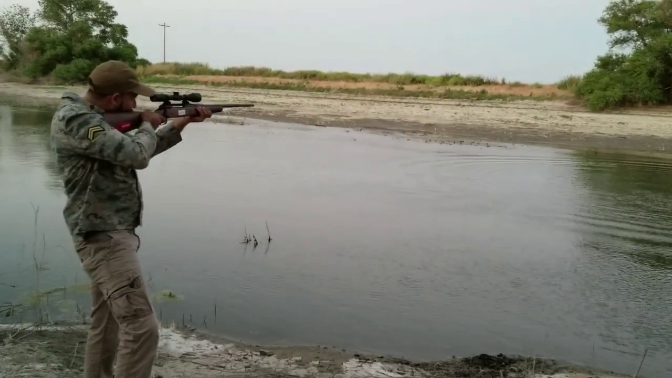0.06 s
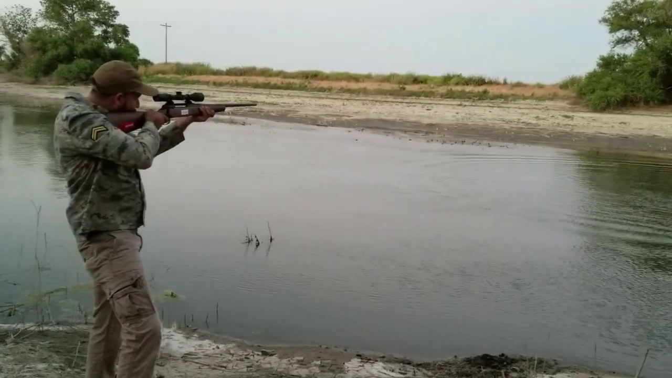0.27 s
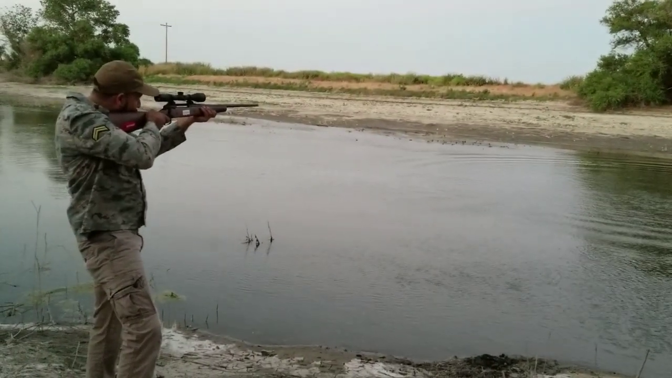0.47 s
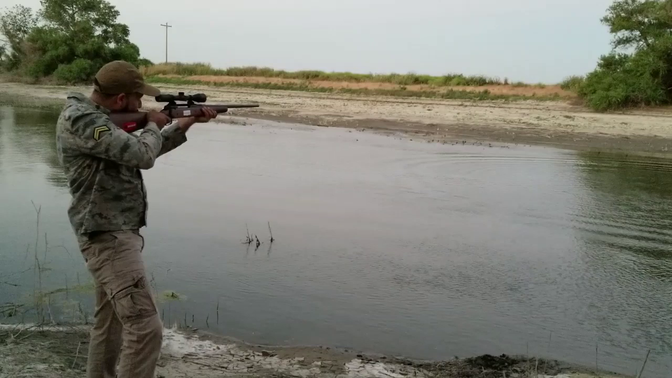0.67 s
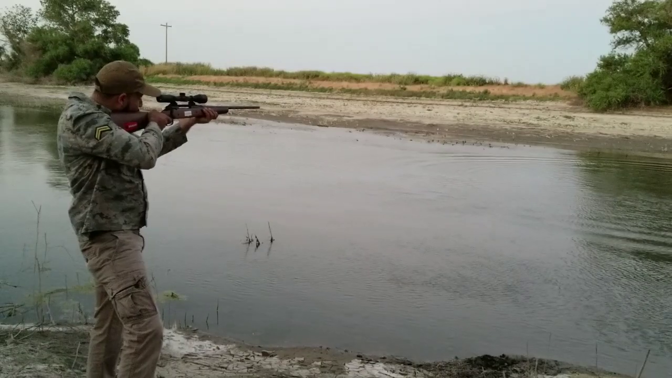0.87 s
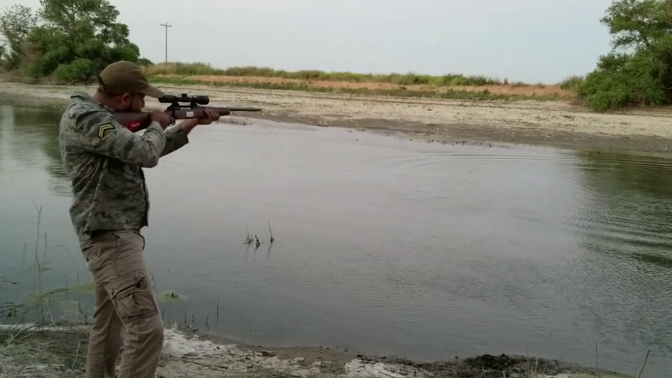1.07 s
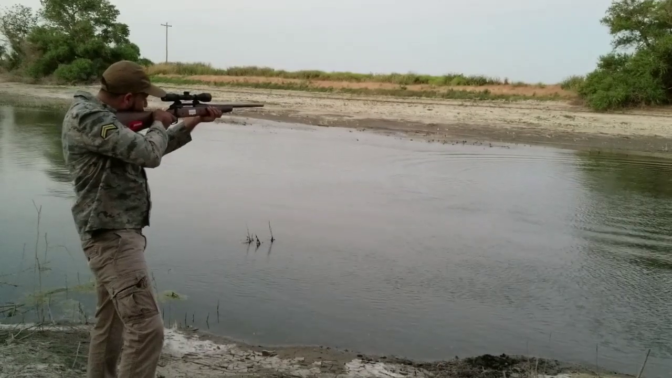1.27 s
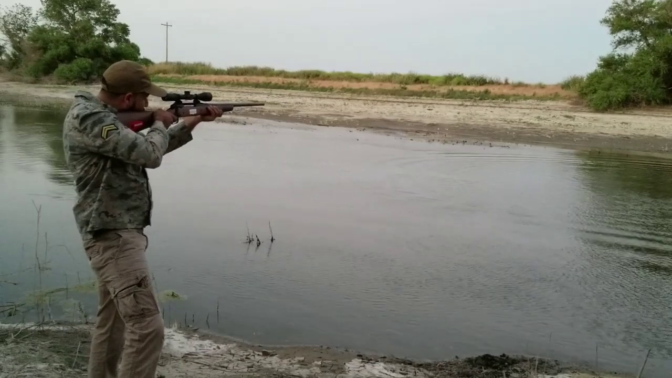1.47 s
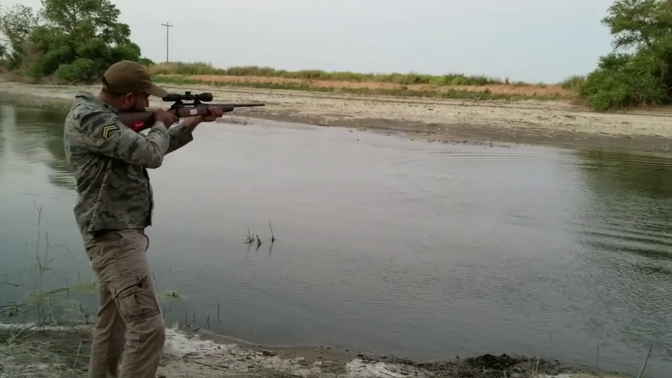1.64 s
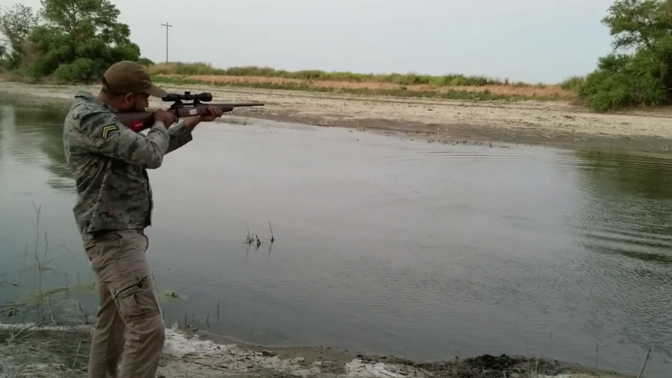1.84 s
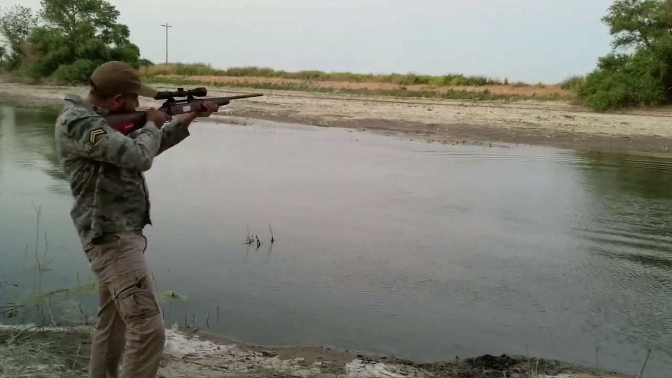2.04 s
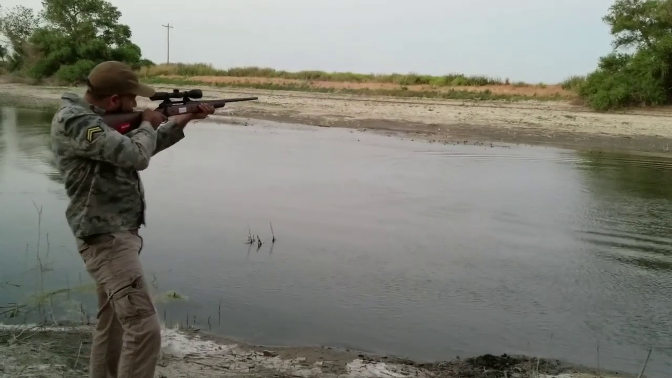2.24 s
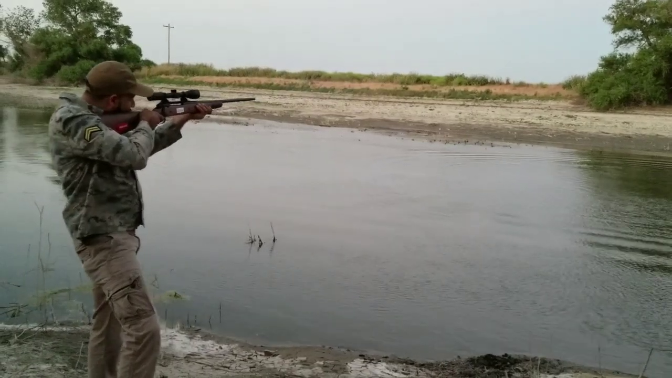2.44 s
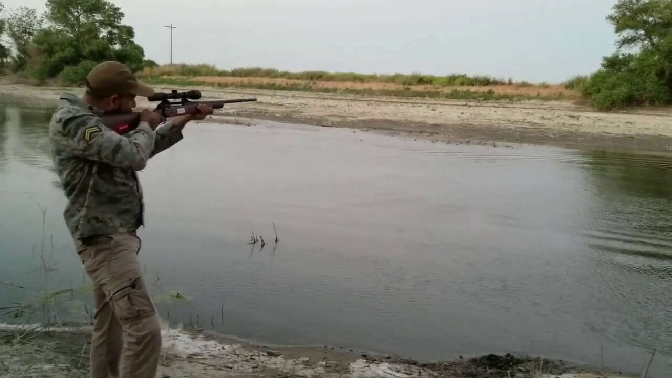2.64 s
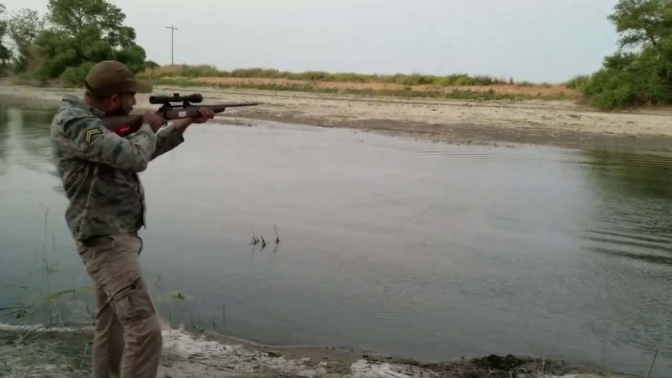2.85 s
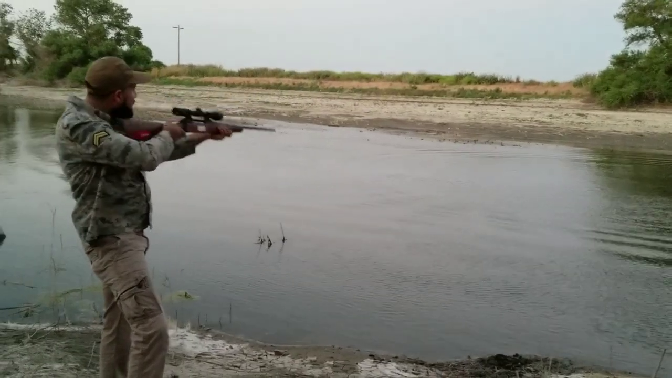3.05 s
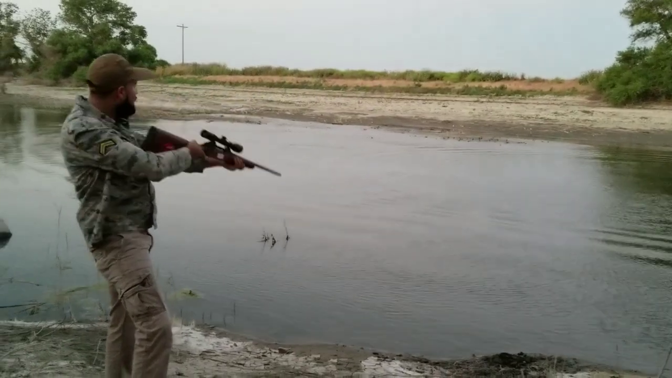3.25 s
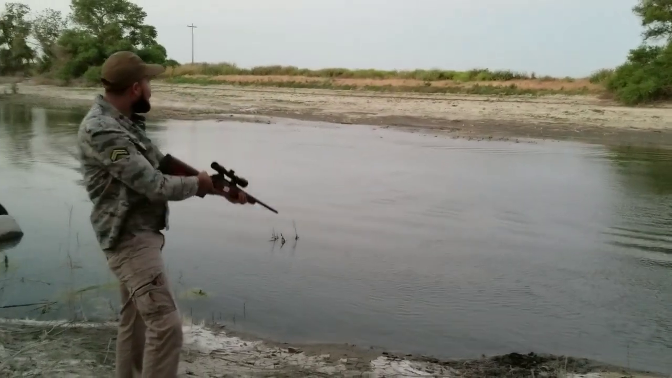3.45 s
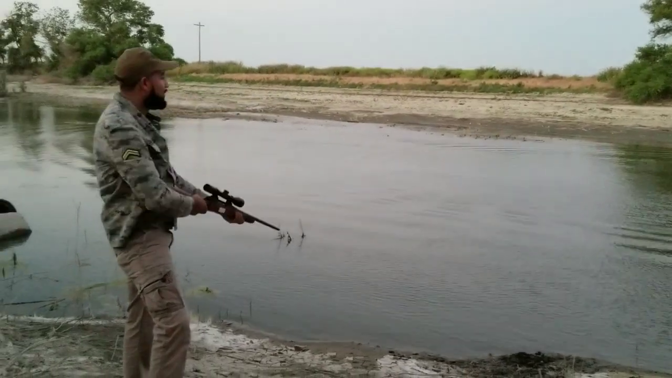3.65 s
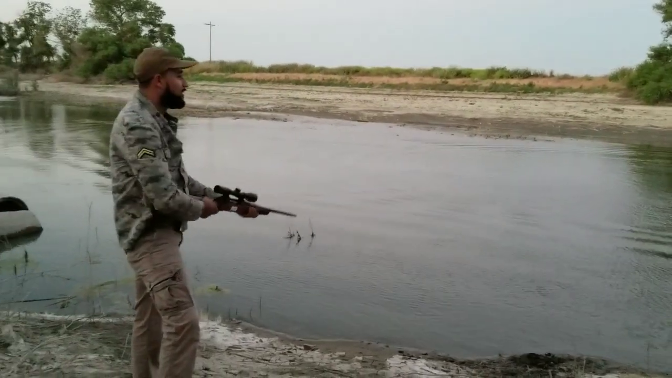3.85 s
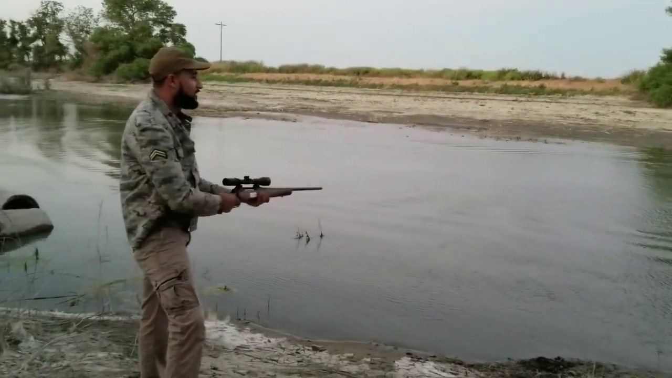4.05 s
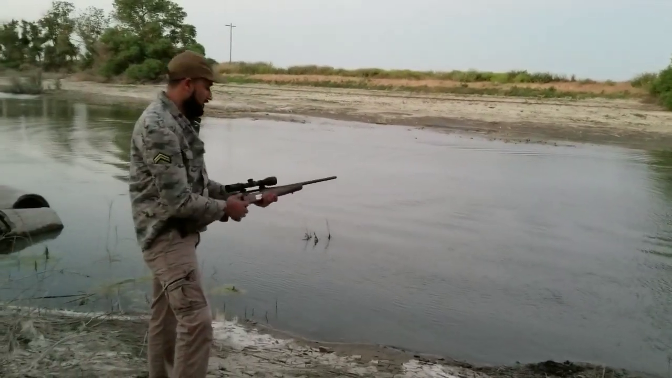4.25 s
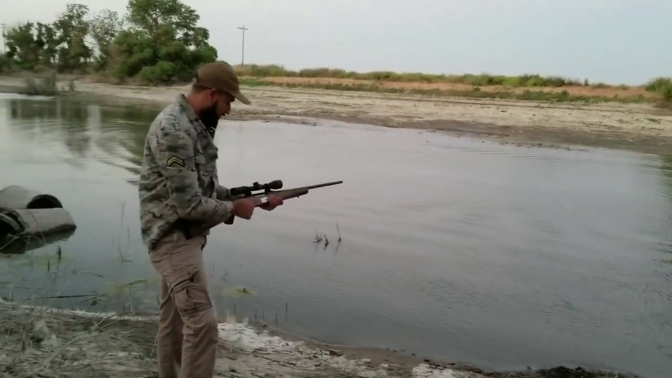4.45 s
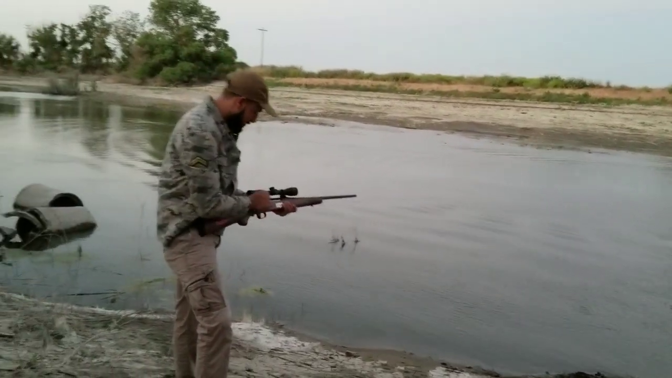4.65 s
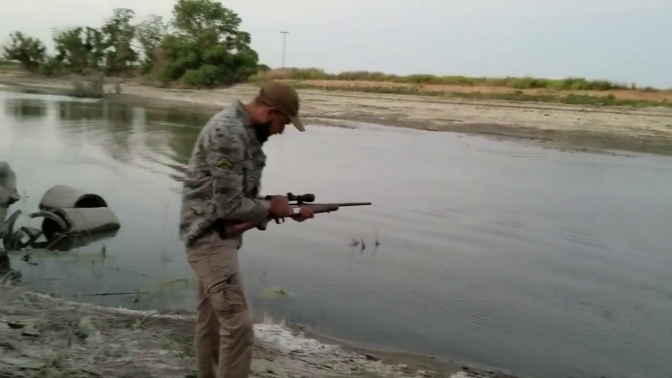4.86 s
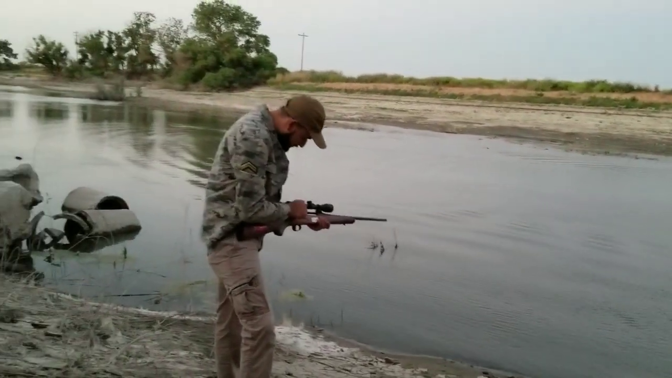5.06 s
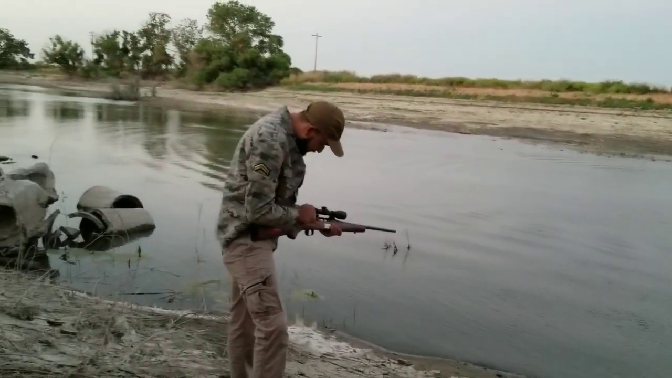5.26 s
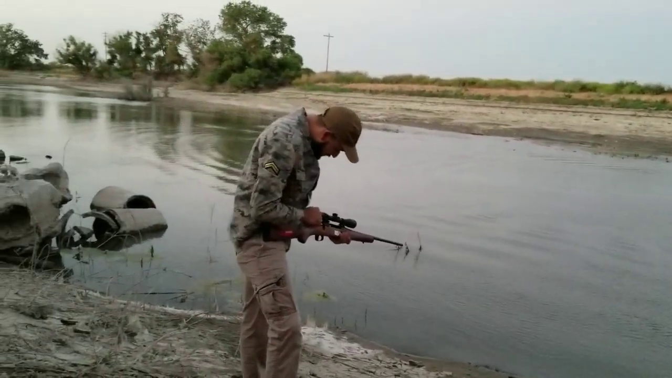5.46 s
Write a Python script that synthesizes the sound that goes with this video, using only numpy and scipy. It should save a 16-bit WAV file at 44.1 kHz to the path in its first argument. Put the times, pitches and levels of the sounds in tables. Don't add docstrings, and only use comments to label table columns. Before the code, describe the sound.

Open waterside, stereo microphones near a rifle shooter. Faint far traffic hum, mostly left, with an engine note swelling and fading, soft hiss and tiny distant bird chips. Then one rifle shot overloads the microphones; echoes return from banks, trees and hills, increasingly dull. The background dips and recovers, and finally the bolt is worked close by in short wood and metal clacks.

```python
import sys
import numpy as np
from scipy import signal
from scipy.fft import rfft, irfft, next_fast_len
from scipy.io import wavfile
from scipy.ndimage import uniform_filter1d, map_coordinates

SR = 44100
rng = np.random.default_rng(int(sys.argv[2]) if len(sys.argv) > 2 else 0)


def gain_from_db(level_db):
    decades = np.asarray(level_db, float) / 20
    return 10 ** decades


def master_out(mix):
    frames = np.transpose(np.atleast_2d(mix))
    ceiling = np.clip(frames, -1, 1)
    pcm = np.round(ceiling * 32767).astype(np.int16)
    wavfile.write(sys.argv[1], SR, pcm)


N = 243323
SPACING = 17.5
SHOT = 2.3012


def unit(x):
    return x / np.sqrt(np.mean(x ** 2) + 1e-20)


def along(points, hz):
    f, v = np.transpose(points)
    return np.interp(np.log(hz + 1), np.log(f + 1), v)


def curves(rows):
    s, *cols = np.transpose(rows)
    return np.array([np.interp(np.arange(N) / SR, s, c) for c in cols])


def wobble(rate):
    knots = rng.standard_normal(int(N * rate / SR) + 4)
    return map_coordinates(knots, [np.arange(N) * rate / SR])


def causal(points, size=4096):
    level_db = np.maximum(along(points, np.fft.rfftfreq(size, 1 / SR)), -70)
    cepstrum = irfft(np.log(gain_from_db(level_db)))
    fold = np.r_[1, np.full(size // 2 - 1, 2), 1, np.zeros(size // 2 - 1)]
    h = irfft(np.exp(rfft(cepstrum * fold)))
    return h / np.linalg.norm(h)


def delayed(x, lag):
    m = next_fast_len(len(x), True)
    ramp = np.exp(-1j * np.pi * np.fft.rfftfreq(m) * lag * np.array([[1], [-1]]))
    return irfft(rfft(x, m) * ramp, m)[:, :len(x)]


def scatter(n, directions, spiky_db):
    size = gain_from_db(spiky_db * rng.exponential(1, (len(directions), n)))
    returns = size * rng.standard_normal(size.shape)
    return unit(sum(delayed(r, SPACING * d) for r, d in zip(returns, directions)))


def patchy(x, depth_db):
    z = signal.stft(x, nperseg=256)[2]
    field = uniform_filter1d(rng.standard_normal(z.shape[1:]), size=4, axis=0)
    field = uniform_filter1d(field, size=9, axis=1)
    return unit(signal.istft(z * gain_from_db(depth_db * unit(field)), nperseg=256)[1][:, :N])


# [t/s, level/dB]
AIR = [
    (0.0, -3),
    (0.1, 0),
    (1.3, 1.5),
    (2.9, -1),
    (3.3, -11),
    (3.5, -5),
    (4.0, -1),
    (4.7, 0),
    (5.5, 1),
]
# [t/s, level/dB, half length/s]
DRONE = [
    (.42, -68.5, .4),
    (1.25, -72, .45),
    (2.15, -79, .3),
    (3.82, -73, .25),
    (4.39, -77, .12),
    (5.03, -69, .4),
]
# [f/Hz, level/dB per Hz]
RUMBLE = [(15, -19.5), (30, -11), (81, 2), (108, -1.5), (166, -6), (200, -20), (311, -11), (430, -15.5),
          (771, -10.5), (1110, -18), (1950, -21), (3500, -48), (5000, -45), (8000, -78)]
HISS = [(400, -20), (1500, 2), (4850, -9.5), (8600, -9), (10000, -12), (12500, -8), (13900, -8),
        (14500, -10), (14800, -59.5)]


def countryside():
    air_db, t = curves(AIR)[0], np.arange(N) / SR
    rumble_db = -68.5 + air_db
    rustle_db = 2 * np.exp(-((t - 4.75) / .55) ** 2)
    hiss_db = -83 + .45 * air_db + rustle_db

    def coloured(x, points):
        return unit(signal.oaconvolve(x, causal(points)[None], axes=1)[:, :N])

    def white():
        return rng.standard_normal((2, N))

    traffic = patchy(scatter(N, [-.85, -.7], spiky_db=0.5), depth_db=1.5)
    traffic = coloured(traffic, RUMBLE) * gain_from_db(0.48 * wobble(2.7))
    buffet = coloured(white(), [(15, -9), (40, -1), (90, -6), (200, -39)])
    buffet *= gain_from_db(rumble_db - 8.5 + 3.2 * wobble(5))
    swell = sum(gain_from_db(db - 24 * ((t - s) / half) ** 4) for s, db, half in DRONE)
    engine_hz = 158.5 + .6 * wobble(4)
    engine = swell * gain_from_db(1.5 * wobble(8.6)) * np.sin(2 * np.pi * np.cumsum(engine_hz) / SR)
    hiss = gain_from_db(hiss_db + 8.5) * coloured(white(), HISS)
    return gain_from_db(rumble_db + 2.5) * traffic + buffet + engine + hiss


# [t/s, level/dB, from f/Hz, to f/Hz, length/s]
CHIRPS = [
    (1.107, -78, 5900, 5250, 0.034),
    (1.42, -81, 4900, 4500, .03),
    (2.267, -73, 6700, 5150, 0.051),
    (4.283, -76, 5700, 5270, .03),
    (5.183, -80, 6600, 5576, 0.04),
]


def bird():
    out = np.zeros(N)
    for s, db, from_hz, to_hz, length in CHIRPS:
        u = np.arange(round(length * SR)) / (length * SR)
        blur = 300 * rng.standard_normal(len(u) // 40 + 1).repeat(40)[:len(u)]
        pitch = to_hz + (from_hz - to_hz) * (1 - u) ** 2 + blur
        swell = gain_from_db(db + 1.5) * np.sin(np.pi * u ** 1.95)
        out[round(s * SR):][:len(u)] += swell * np.sin(2 * np.pi * np.cumsum(pitch) / SR)
    return delayed(out, 8)


# [t/s, level/dB, hold/s, boom re level/dB, fizz re level/dB]
BELTS = [(2.3015, -18.5, .007, -5, -6), (2.312, -24, .01, -1, -1), (2.321, -18, .028, 3, -7.5),
         (2.385, -32, .02, -7, -10), (2.44, -38.5, .16, -7, -6.5), (2.542, -40, .02, -2, 8),
         (2.65, -44.5, .075, -6, -8), (2.8, -57, .035, -2, -11), (2.92, -55.5, .15, -3, -7),
         (3.12, -57.5, .1, -8, -10), (3.27, -61, .045, -8, -10), (3.39, -66, .05, 4, -16),
         (3.48, -66, .3, 0, -19), (3.88, -75, 1.1, 8, -18)]


def belts():
    t, power = np.arange(0, N, 8) / SR, 0
    fizz_faster = np.array([[1], [1], [1.3]])
    for s, db, hold, boom_db, fizz_db in BELTS:
        rise_s = .0009 + .03 * max(s - SHOT, 0)
        rise = 1 - np.exp(-np.clip(t - s + .004, 0, None) / rise_s)
        fall_rate = 12 / (hold + .012)
        fall_db = fall_rate * np.clip(t - s - hold, 0, None) * fizz_faster
        balance_db = np.array([[boom_db], [1.5], [fizz_db + 3]])
        power = power + (rise ** 3 * gain_from_db(db - fall_db + balance_db)) ** 2
    return np.sqrt(power).repeat(8, axis=1)[:, :N]


# [t/s, peak level/dB, tilt/dB: hard and small bright, broad and soft dark]
BLOWS = [(2.3025, -4, 2), (2.3055, -4, -2), (2.316, -3, -8), (2.323, -11, 4), (2.331, -7, 0),
         (2.339, -8, -8), (2.343, -6, -9), (2.348, -7, -4), (2.354, -9, -4), (2.36, -12, -1),
         (2.372, -27, -9), (2.38, -26, -6)]
BANKS = [(2.462, -30, 13), (2.482, -27, 4), (2.511, -26, -3), (2.538, -17, 6), (2.552, -17, 13),
         (2.574, -28, 4), (2.645, -24, -3), (2.662, -23, -4), (2.684, -27, -6), (2.762, -38, -2),
         (2.805, -45, 0), (2.819, -44, -6), (2.99, -39, -4), (3.05, -40, -7), (3.067, -41, -9),
         (3.146, -46, -4), (3.311, -43, -2), (3.327, -55, -2), (3.342, -53, -2)]
HILLS = [(3.405, -48, -11), (3.447, -54, -3), (3.474, -42, 9), (3.489, -41, 9), (3.511, -45, 12),
         (3.554, -46, -4), (3.572, -41, -11), (3.599, -50, -6), (3.694, -49, -13), (3.74, -49, 0),
         (3.768, -50, 2), (3.786, -48, -13), (4.015, -50, -4)]
SWELLS = [
    (2.52, -27, -12),
    (2.635, -31, -6),
    (2.712, -35, 5),
    (2.95, -41, 7),
    (3.03, -42, 8),
    (3.21, -48, 9),
]
WOODS = [
    (3.385, -55, -7),
    (3.685, -54, -8),
    (3.715, -54, -4),
    (3.75, -52, -2),
    (3.785, -53, -8),
]
KINDS = {"blows": (.0022, .3, -9, -11), "banks": (.0105, -.78, -12, -12), "hills": (.011, .8, -13, -24),
         "swells": (.02, -.78, -11, -18), "woods": (.02, -.2, -11, -20)}


def reflections():
    around = patchy(scatter(N, [-.95, -.7, .75, 1.0], spiky_db=1.2), depth_db=1.6)
    lumps, parts = gain_from_db(.6 * wobble(60)), np.zeros((3, 2, N))
    u = np.arange(3600) / SR
    lead = 20
    pulse_parts = np.array([1, 1, 0])[:, None, None]
    for rows, (depth, side, boom_db, fizz_db) in zip([BLOWS, BANKS, HILLS, SWELLS, WOODS], KINDS.values()):
        deep = np.clip(depth, 2e-4, .02)
        front = delayed(np.arange(len(u)) == lead, SPACING * side) * 0.011 / deep
        envelope = (1 - np.exp(-u / (0.24 * deep))) * np.exp(-u / deep)
        for s, db, tilt_db in rows:
            echo = 1.6 * scatter(len(u), [side, side + 0.34], spiky_db=1.26) * envelope
            balance_db = np.array([boom_db - tilt_db, 0, fizz_db + tilt_db])
            strength = gain_from_db(db - 7 + balance_db)[:, None, None]
            parts[..., round(s * SR) - lead:][..., :len(u)] += strength * (echo + front * pulse_parts)
    start, end, share = 2.45, 3.35, .8
    left = share * (np.abs(np.arange(N) / SR - (start + end) / 2) < (end - start) / 2)
    bank = patchy(scatter(N, [-.72, -.55], spiky_db=1.2), depth_db=2.2)
    bed = np.sqrt(1 - left) * around + np.sqrt(left) * bank
    return parts + belts()[:, None] * lumps * bed


# [f/Hz, level/dB per Hz]
BLAST = [(30, -50.5), (70, -28.5), (110, -17), (180, -7.5), (400, -5.5), (750, -8), (1300, -6),
         (2300, -8.5), (3200, -19.5), (6000, -23.5), (8000, -25.5), (9500, -27.5), (13500, -28.5),
         (14600, -34.5), (15300, -66)]
# [f/Hz, level/dB]
GRAZING = [(100, -4), (230, -8), (500, 3.5), (900, 4), (1350, -2), (2000, 2.5), (2700, -4), (3500, -7)]


def shot():
    travel = np.clip(np.arange(N) / SR - SHOT, 0, None)
    boom, body, fizz = reflections()
    near = causal(BLAST)
    far = np.convolve(near, causal(GRAZING))[:len(near)]

    def band(h, edges, kind="band"):
        return signal.sosfilt(signal.butter(N=4, Wn=edges, btype=kind, fs=SR, output="sos"), h)

    def heard(x, h, ref):
        return signal.oaconvolve(x, h[None] / np.linalg.norm(ref), axes=1)[:, :N]

    skim = np.clip((travel - .75) / 0.53, 0, 1)
    out = 0
    for h, share in (near, np.sqrt(1 - skim)), (far, np.sqrt(skim)):
        low, mid = band(h, 550, "low"), band(h, [550, 3000])
        out = out + heard(share * boom, low, low) + heard(share * body, mid, mid)
    treble = band(near, [3000, 8000])
    for lo, hi in (3000, 5200), (5200, 8000), (8000, 11500), (11500, 13200), (13200, 18000):
        loss_rate = 8.3 * (lo * min(hi, 17500) / 4000 ** 2 - 1)
        loss_db = loss_rate * np.clip(travel - .06, 0, 1.2)
        out = out + gain_from_db(-loss_db) * heard(fizz, band(near, [lo, hi]), treble)
    u = travel / 0.0037
    gas_push = gain_from_db(-13.5) * u * (1 - u / 2) * np.exp(-u)
    return out + gas_push


# [t/s, peak level/dB, ring f/Hz, crack re peak/dB]
BOLT = [(4.5605, -62, 1850, -16), (4.6021, -50, 2382, -23), (4.7564, -65, 1320, -20),
        (4.8528, -29.5, 1290, -26), (4.9526, -49, 2600, -16), (4.9666, -33, 1918, -19.5),
        (4.9689, -31, 1230, -15.5), (4.9741, -29.5, 1266, -18.5), (5.008, -28.5, 2190, -28),
        (5.3711, -23.5, 1374, -22), (5.3747, -37, 1428, -14), (5.3818, -28, 2010, -24),
        (5.389, -43, 2010, -21), (5.405, -55, 1880, -17)]
TICKS = [(4.851, -48, 2083, -22.5), (4.856, -43, 2500, -40), (4.855, -56, 4600, -40),
         (4.604, -53.5, 1192, -40), (4.603, -60, 4330, -40), (4.603, -52, 1830, -40),
         (4.97, -34.5, 1970, -27.5), (4.972, -42, 2550, -40), (5.362, -44.5, 1304, -28),
         (5.373, -33, 1894, -13.5), (5.375, -38, 556, -31), (5.372, -45, 3900, -30),
         (5.382, -47.5, 6300, -30.5)]
# [f/Hz, level/dB, t60/s]
STEEL = [(2500, -9, 0.015), (4300, -20, 0.0096), (6706, -22, .016), (8150, -17, 0.012), (13386, -28, 0.044)]
CONTACT, TOUCH = (.0135, .0014), (.014, .0008)  # t60/s, rise/s of contacts and of touches


def bolt():
    wood, metal, t = np.zeros(N + SR), np.zeros(N + SR), np.arange(SR // 8) / SR
    for s, db, hz, crack_db, t60, rise in [row + CONTACT for row in BOLT] + [row + TOUCH for row in TICKS]:
        steel = 0
        for f, level, life in STEEL:
            mode_db = level + rng.normal(0, 4.55) - 60 * t / life
            steel = steel + gain_from_db(mode_db) * np.sin(2 * np.pi * f * t)
        crack = 1.7 * gain_from_db(-60 * t / 0.0099) * rng.standard_normal(len(t))
        dull = np.clip(17000 * gain_from_db(1.3 * (crack_db + 18.5)), 2500, 18000)
        crack = signal.lfilter(*signal.butter(N=2, Wn=dull, fs=SR), crack)
        start = 1 - np.exp(-(t / max(rise, 1e-4)) ** 2)
        chatter = uniform_filter1d(rng.standard_normal(len(t)), size=12) * 2.78
        start *= np.abs(1 + 0.35 * chatter)
        ring = start * np.sin(2 * np.pi * hz * t)
        at = round(s * SR)
        wood[at:][:len(t)] += gain_from_db(db + 8 - 60 * t / t60) * ring
        metal[at:][:len(t)] += gain_from_db(db + 6 + crack_db) * (gain_from_db(7) * steel + crack)
    tail = rng.standard_normal((2, SR // 4)) * gain_from_db(-60 * np.arange(SR // 4) / SR / 0.17)
    spill = gain_from_db(-24) * wood + gain_from_db(-3.5) * metal
    wet = signal.oaconvolve(spill[None], tail / np.linalg.norm(tail[0]), axes=1)
    close = delayed((wood + metal)[:N], -2) * gain_from_db([[-.5], [.5]]) + wet[:, :N]
    return signal.sosfilt(signal.butter(N=4, Wn=[450, 14600], btype="band", fs=SR, output="sos"), close)


def scene():
    return countryside() + bird() + shot() + bolt()


def low_pass(x):
    return signal.sosfilt(signal.butter(12, 15670, fs=SR, output="sos"), x)


def record(dry):
    held = dry / (1 + np.abs(dry / .95) ** 3) ** (1 / 3)
    fade = np.clip((N - np.arange(N)) / (.006 * SR), 0, 1)
    return low_pass(held * fade)


dry = scene()
out = record(dry)
master_out(out)
```